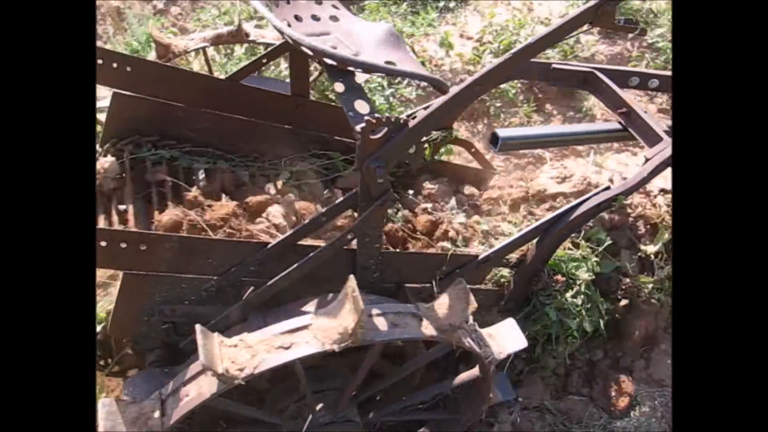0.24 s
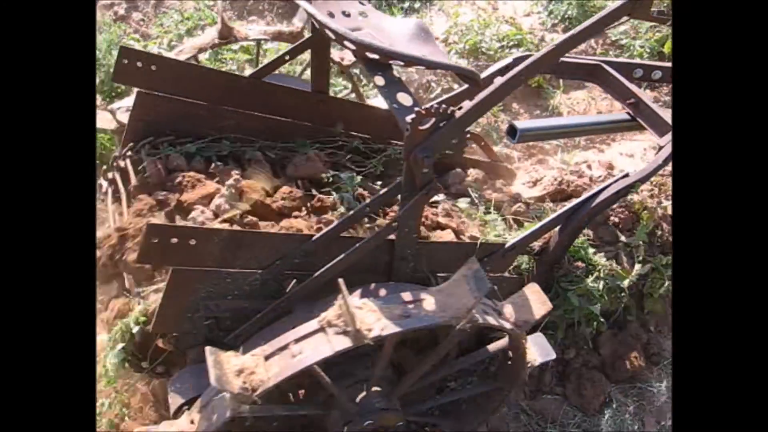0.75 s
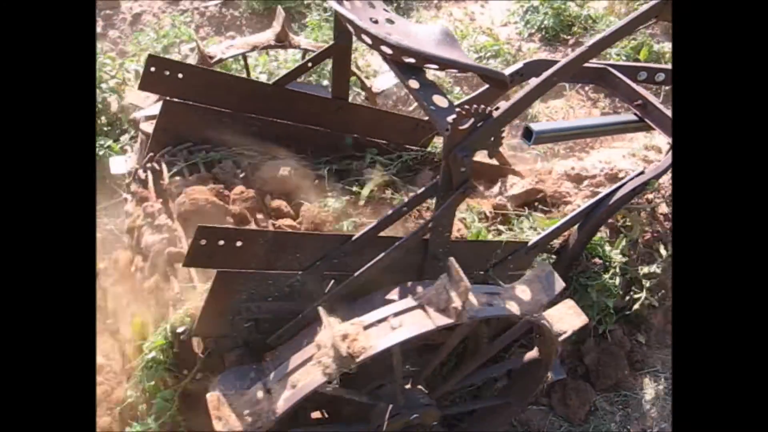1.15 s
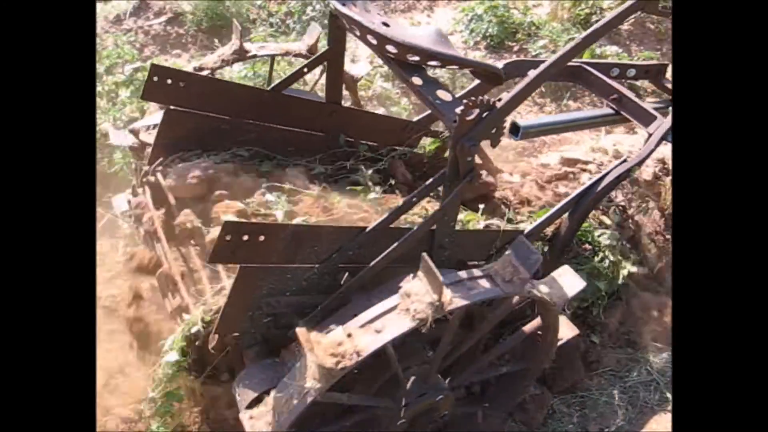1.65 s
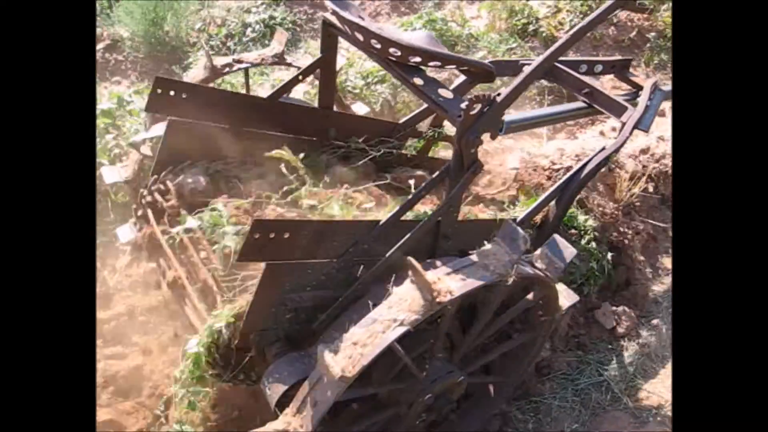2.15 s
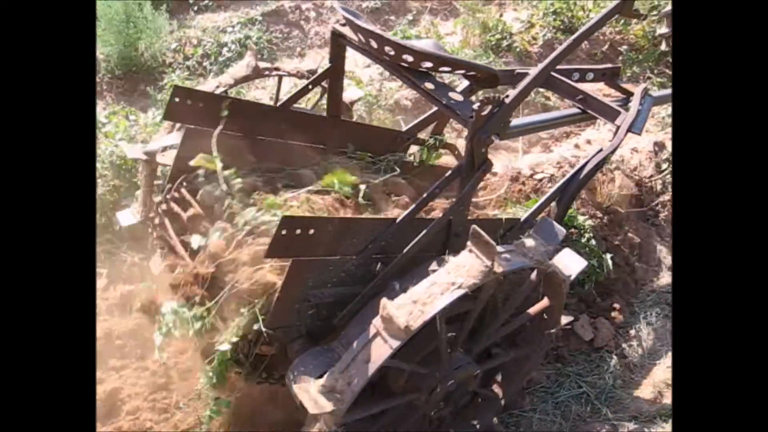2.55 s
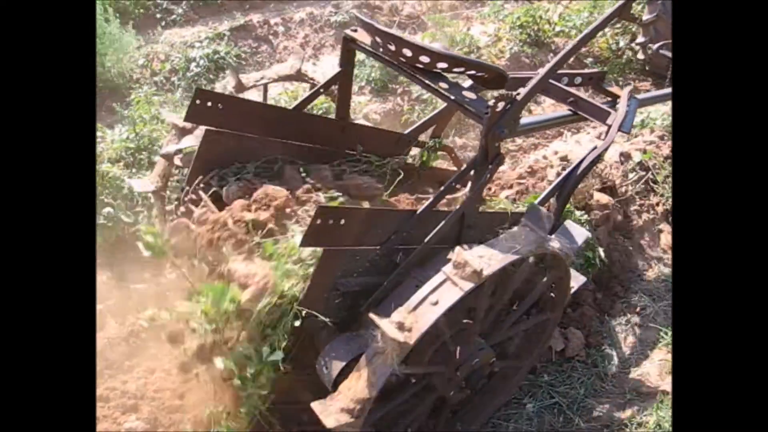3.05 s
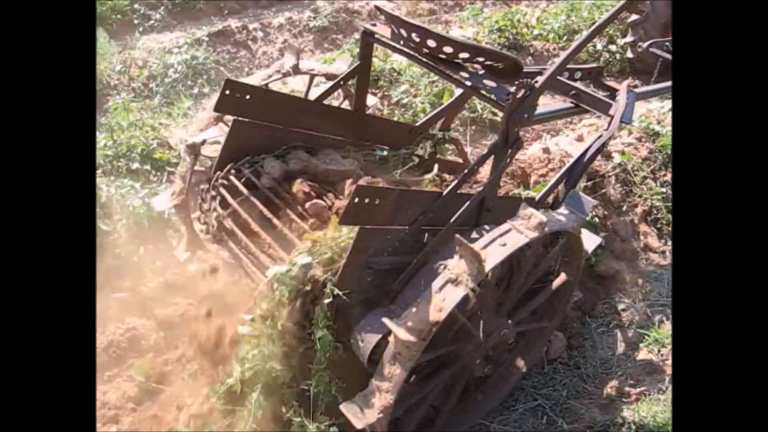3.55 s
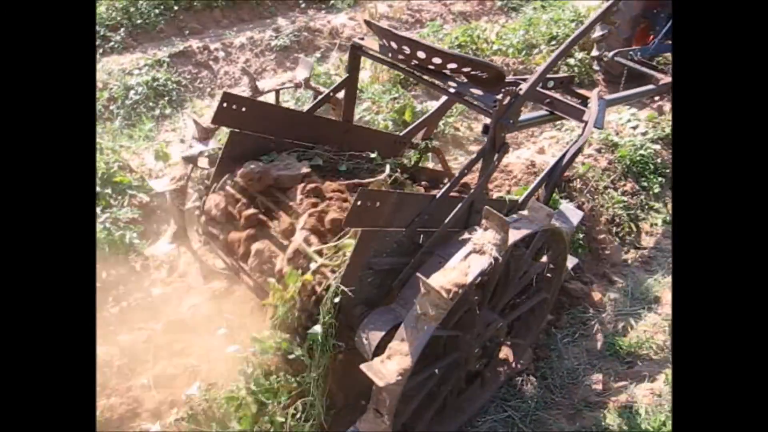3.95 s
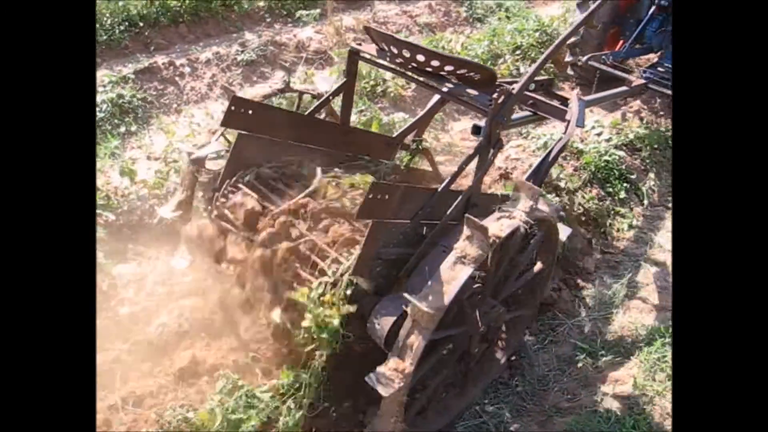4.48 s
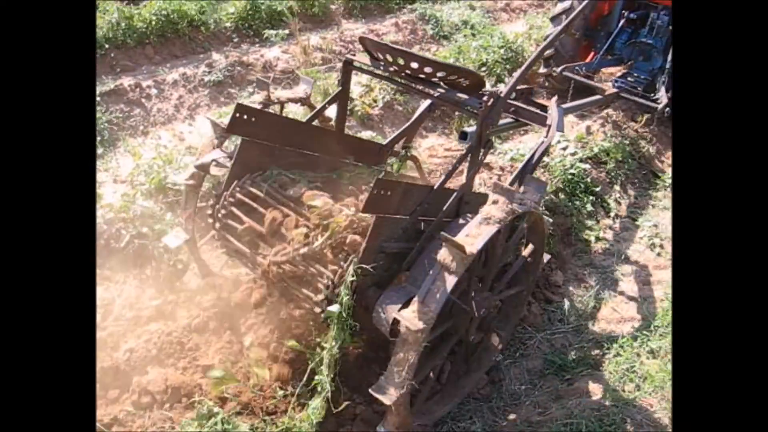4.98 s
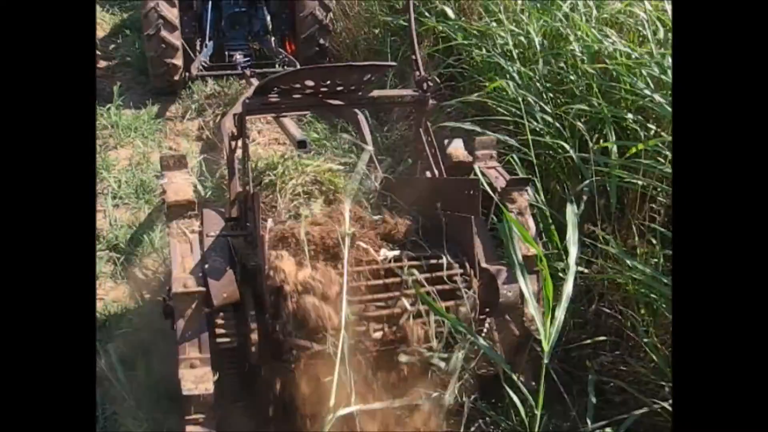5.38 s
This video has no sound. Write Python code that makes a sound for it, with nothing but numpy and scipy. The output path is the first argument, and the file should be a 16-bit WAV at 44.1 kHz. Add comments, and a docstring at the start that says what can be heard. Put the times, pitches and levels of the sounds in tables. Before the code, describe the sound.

Earth thuds through an old digger's rattling steel chain, with short, piercing bearing squeals over a low tractor chug.

```python
"""An old potato digger rolls past, its dry bearing squealing loudly once a turn.
Clods of earth thud through its chain of steel rods, the links clatter, rods slap the frame
and loose parts ring, while the tractor pulling it chugs underneath. A limiter turns everything
down during the loudest peaks. The last moment is heard from behind the machine,
where the engine and the bare chain are plainer."""
import sys
import numpy as np
from scipy import signal
from scipy.fft import rfft, irfft, next_fast_len
from scipy.io import wavfile
from scipy.ndimage import uniform_filter1d, minimum_filter1d, map_coordinates

SR = 44100
rng = np.random.default_rng(int(sys.argv[2]) if len(sys.argv) > 2 else 0)


def master(y):
    """Save y as 16-bit WAV."""
    cut = np.clip(np.atleast_2d(y).T, -1, 1)
    pcm = np.round(cut * 32767)  # scale
    wavfile.write(sys.argv[1], SR, pcm.astype(np.int16))


N = 247842
T = np.arange(N) / SR
BEHIND_S = 5.306  # from here on we listen from behind


def amp(db):
    """Turn decibels into a volume factor."""
    return 10 ** (np.asarray(db) / 20)


def unit(x):
    """Scale a sound to an average strength (rms) of 1."""
    return x / np.sqrt(np.mean(x ** 2) + 1e-20)


def decay(t, fade_s):
    """Die away by 60 dB in fade_s: this is what every 'fade time' below means."""
    return np.exp(-np.log(1000) * t / fade_s)


def noise():
    """A plain, even hiss."""
    return rng.standard_normal(N)


def wobble(rate):
    """A smooth curve through rate random values a second."""
    return map_coordinates(rng.standard_normal(int(N * rate / SR) + 4), [T * rate])


def filtered(x, response):
    """Turn each frequency of x up or down by response(hz)."""
    size = next_fast_len(N + SR // 2)
    return irfft(rfft(x, size) * response(np.fft.rfftfreq(size, 1 / SR)), size)[:N]


def coloured(x, colour):
    """Shape x with a tone colour, a list of (frequency [Hz], level [dB]), at strength 1."""
    freqs, db = np.transpose(colour)
    return unit(filtered(x, lambda hz: amp(np.interp(np.log(hz + 1), np.log(freqs), db))))


def add(track, s, sound):
    """Mix a sound into the track at second s."""
    part = track[max(round(s * SR), 0):][:len(sound)]
    part += sound[:len(part)]


def contacts(rate, spread_db, fade_s):
    """Little hits at random moments, about rate a second, each a burst of hiss."""
    blows = (rng.random(N) < rate / SR) * amp(spread_db * np.clip(noise(), -2, 2))
    power = signal.lfilter([1], [1, -decay(1 / SR, fade_s) ** 2], blows ** 2)
    return unit(np.sqrt(power) * noise())


# Each time the dry bearing catches, a few times a turn:
# (time [s], length [s], pitch [Hz], level [dB], roughness [0-1], fade time [s], lower tone [Hz])
BEARING_GRIPS = [(0.408, 0.019, 3990, -25, 0.05, .08, 3150), (0.424, 0.037, 3917, -5, 0.14, .05, 3100),
                 (0.442, 0.045, 3786, -0.5, 0.1, .06, 3370), (0.494, 0.033, 3915, -19, 0.9, 0.31, 3460),
                 (1.163, 0.016, 4070, -16, 0.3, .04, 3260), (1.172, 0.034, 3948, -3, 0.12, .12, 3180),
                 (1.199, 0.038, 3794, -12, 0.3, .1, 3070), (1.234, 0.029, 3850, -11, .35, .1, 3360),
                 (1.242, 0.09, 3990, -12, 0.49, .42, 3400), (1.854, 0.058, 3770, -4.5, 0.13, .08, 3500),
                 (1.915, 0.055, 3820, -20.5, 0.45, .08, 3420), (2.577, 0.056, 3912, 3.5, 0.06, .1, 3170),
                 (2.629, 0.038, 3938, -1.5, 0.24, .08, 3280), (2.648, 0.061, 3995, -19.5, 0.9, .25, 3460),
                 (2.705, 0.033, 3940, -13, 0.33, .12, 3430), (3.38, 0.033, 3912, -1, 0.16, .08, 3100),
                 (3.408, 0.039, 3980, -14.5, 0.48, .18, 3270), (3.484, 0.024, 3900, -15, .35, .12, 3300)]

def bearing():
    """Dry metal grips and squeals; two weaker tones scrape along, then the main one rings out."""
    free_hz, sag_s = 4040, 0.0058  # a grip drags the wheel's own note down to the grip's pitch
    upper_hz = 4740
    out, t = np.zeros(N), T[:SR // 2]
    # uneven slipping makes each of the three tones tremble
    shake = np.array([wobble(rate) + 1j * wobble(rate) for rate in (200, 200, 260)]) / np.sqrt(2)
    scrape = coloured(noise(), [(2500, -29), (3200, 0.5), (3900, 3.5), (4500, -5), (5400, -20.5)])
    for s, length, hz, db, rough, fade_s, lower_hz in BEARING_GRIPS:
        here = slice(round(s * SR), round(s * SR) + len(t))
        progress = np.minimum(t / length, 1)
        swell = np.abs(np.sin(np.pi * progress)) ** 1.11
        ring = amp(-9) * progress ** 2 * decay(np.maximum(t - length, 0), fade_s)
        cycles = np.cumsum(hz + (free_hz - hz) * np.exp(-t / sag_s)) / SR
        strength = swell * (1 + rough * shake[0, here]) + ring
        squeal = np.imag(strength * np.exp(2j * np.pi * cycles))
        side_tones = np.exp(2j * np.pi * np.outer([lower_hz, upper_hz], t))
        lower, upper = np.imag((1 + 0.93 * shake[1:, here]) * side_tones)
        rub = amp(-9.5) * lower + amp(-16) * upper + amp(-7) * scrape[here]
        add(out, s, np.sqrt(2) * amp(db) * (squeal + rough * swell * rub))
    return out


# How hard the digger works: (time [s], soil level [dB], chain level [dB])
WORKLOAD = [(0, -25, -30), (0.3, -19.5, -28), (0.5, -25.5, -30.5), (0.679, -20.5, -27),
            (0.79, -26.5, -31.5), (0.95, -18.5, -26.5), (1.248, -23, -33), (1.42, -24.5, -25.5),
            (1.549, -32, -29.5), (1.72, -19.5, -27.5), (1.95, -16.5, -32), (2.15, -25.5, -30.5),
            (2.351, -18.5, -28), (2.8, -19, -31.5), (3.25, -20.5, -30), (3.4, -26.5, -30.5),
            (3.75, -18.5, -31), (5.3, -18, -33.5)]
# Batches of soil tumbling over the chain: (time [s], length [s], level [dB])
SOIL_BATCHES = [(0.014, 0.024, -14.5), (0.211, 0.078, -16.5), (0.32, 0.058, -17.5), (0.559, 0.037, -14.5),
                (1.048, 0.059, -12.5), (1.145, 0.067, -11.5), (1.235, 0.046, -5.5), (1.762, 0.095, -13.5),
                (1.945, 0.042, -25), (2.02, 0.066, -17), (2.162, 0.054, -15.5), (2.374, 0.024, -26),
                (2.56, 0.025, -8.5), (2.688, 0.047, -19), (2.748, 0.073, -10.5), (2.856, 0.029, -13.5),
                (2.923, 0.066, -20), (3.016, 0.027, -16), (3.06, 0.029, -16), (3.171, 0.038, -11.5),
                (3.226, 0.077, -11.5), (3.494, 0.12, -14.5), (3.628, 0.13, -12.5), (3.852, 0.042, -16),
                (3.924, 0.098, -14), (4.084, 0.093, -15.5), (4.342, 0.3, -13), (4.656, 0.029, -15),
                (4.697, 0.23, -19), (4.906, 0.058, -15), (4.993, 0.188, -14.5), (5.19, 0.074, -23.5)]
# Tone colour of pouring earth: (frequency [Hz], level [dB])
POUR_COLOUR = [(60, -35), (130, -17), (220, 0), (330, 1), (450, -4.5), (650, -7.5), (900, -12.5),
               (1400, -18), (3000, -44)]

def soil():
    """Clods, crumbs and loose earth cross the chain in a flow, plus batches that come and go."""
    times, flow_db, _ = np.transpose(WORKLOAD)
    power = amp(np.interp(T, times, flow_db)) ** 2
    rise_s, drain_s = 0.008, 0.005
    for s, length, db in SOIL_BATCHES:
        rise = np.clip((T - s) / rise_s + 0.5, 0, 1)
        drain = np.exp(-np.maximum(T - s - length, 0) / drain_s)
        power += (amp(db - 2) * rise * drain) ** 2
    clods = thuds(pitch_hz=198.6, pitch_spread=0.4, fade_cycles=4.6, spread_db=4, count=1100)
    crumbs = thuds(pitch_hz=425, pitch_spread=0.47, fade_cycles=4, spread_db=3, count=1100)
    pour = coloured(contacts(rate=260, spread_db=3, fade_s=0.034), POUR_COLOUR)
    return np.sqrt(power) * (amp(-1) * clods + amp(-8.5) * crumbs + amp(-5) * pour)


def thuds(pitch_hz, pitch_spread, fade_cycles, spread_db, count):
    """Lumps land at random moments, each a short, dull push; deeper ones are louder."""
    samples = np.arange(SR // 25)
    starts = rng.integers(0, N, count)[:, None]
    pitch, size = np.clip(rng.standard_normal((count, 2)), -2, 2).T[:, :, None]
    cycles = pitch_hz * np.exp(pitch_spread * pitch) * samples / SR
    strength = amp(spread_db * size) * np.exp(-pitch_spread * pitch / 2)
    pushes = strength * np.sin(2 * np.pi * cycles) * cycles * decay(cycles, fade_cycles)
    return unit(np.bincount((starts + samples).ravel(), pushes.ravel(), N)[:N])


# Big clods hitting the chain: (time [s], level [dB], pitch [Hz])
BIG_CLODS = [(0.022, -15, 174), (1.048, -3, 200), (1.091, -10, 164), (1.145, -6, 271), (1.708, -9, 210),
             (1.809, -5, 223), (2.16, -11, 196), (3.066, -6, 287), (3.643, -15, 144), (3.777, -5, 208),
             (3.911, -14, 164), (4.08, -1.5, 176), (4.111, -11, 185), (5.119, -5.5, 498), (5.192, -11, 181)]
# Tone colour of the low part of a hit: (frequency [Hz], level [dB])
HIT_COLOUR = [(200, -21), (500, -2), (900, 6.5), (1400, 2.5), (2000, -31.5)]

def heavy_clods():
    """A big clod lands with a dull push and crumbles."""
    push, crumble = np.zeros((2, N))
    t = T[:SR // 12]
    for s, db, hz in BIG_CLODS:
        fade = amp(db) * np.exp(-t / 0.0061) * (1 - np.exp(-t / 0.0022))
        add(push, s, fade * np.sin(2 * np.pi * hz * t))
        add(crumble, s, fade)
    return push + amp(-12.5) * crumble * coloured(noise(), HIT_COLOUR)


# Rods hitting the frame: (time [s], level [dB], brightness [dB], fade time [s])
ROD_SLAPS = [(0.1093, -15.5, -3.5, 0.28), (0.1534, -4.5, 3.5, 0.16), (0.21, -20.5, -3, 0.088),
             (0.332, -16.5, -2.5, .22), (0.5998, -14, 2, 0.16), (0.6697, -19, 3, 0.11),
             (0.9132, -2.5, 5, 0.12), (0.971, -10.5, 4.5, .21), (1.013, -15.5, -8, 0.22),
             (1.2543, -13.5, 12.5, 0.28), (1.645, -6.5, 7, 0.19), (1.6965, -10.5, 9.5, .15),
             (1.7913, -16.5, 1, 0.084), (2.0008, -7.5, 1, 0.11), (2.0437, -17, -2, 0.24),
             (2.4266, -14.5, 5, 0.058), (2.4696, -11, 3, .07), (2.8606, -17.5, -7, 0.16),
             (2.9069, -16.5, -2, 0.065), (3.163, -14.5, -2.5, 0.65), (3.5566, -12.5, -1.5, 0.31),
             (3.919, -18.5, 1, 0.19), (3.9752, -15, -8, .1), (4.0173, -17.5, 5, .09),
             (4.2102, -11.5, -1.5, .08), (4.2499, -15.5, -1, 0.15), (4.6308, -10.5, 5, 0.14),
             (4.7175, -18.5, 0, 0.14), (4.963, -7.5, 7, .12), (5.0739, -16.5, -6, .17),
             (5.3112, -10, -2, .4), (5.3776, -15.5, -5, 0.36)]
# Tone colours of the rattle and of high, gritty hiss: (frequency [Hz], level [dB])
RATTLE_COLOUR = [(900, -13), (1500, -1.5), (2400, 1.5), (3300, -3.5), (4000, -7.5), (4600, -22)]
GRIT_COLOUR = [(2000, -23.5), (3500, -4), (4100, 6), (4500, -2), (4900, 6.5), (5500, -11.5)]

def rod_slaps():
    """A rod slaps the frame: a sharp crack, then a rattling crash that sets the steel ringing."""
    low, mid, high = np.zeros((3, N))
    t = T[:SR // 3]
    for s, db, bright_db, fade_s in ROD_SLAPS:
        crack = 0.3 * np.exp(-t / 0.0012)
        fade = amp(db - 10.5) * (decay(t, fade_s) + crack)
        add(low, s, amp(-3.5 - bright_db) * fade)
        add(mid, s, fade)
        add(high, s, amp(-12.5 + bright_db) * fade)
    rattle = coloured(contacts(rate=4100, spread_db=0, fade_s=0.0033), RATTLE_COLOUR)
    crash = low * coloured(noise(), HIT_COLOUR) + mid * rattle + high * coloured(noise(), GRIT_COLOUR)
    return crash + amp(-9) * steel(mid * noise())


# The notes the steel frame rings on: (pitch [Hz], level [dB], fade time [s])
FRAME_NOTES = [(872, 5, 0.024), (1031, 0.5, 0.098), (1220, -9, 0.068), (1709, 1, 0.11), (2185, 3, 0.13),
               (2360, -1.5, 0.17), (2620, -12, 0.14), (2970, -1, 0.037), (3236, 2, 0.17),
               (3030, -8.5, 0.22), (3850, -4, 0.19), (4480, -11.5, 0.17), (4880, -16, 0.062)]

def steel(blows):
    """Struck steel rings; which notes stand out depends on where each blow lands."""
    out = np.zeros(N)
    for hz, db, fade_s in FRAME_NOTES:
        keep = decay(1 / SR, fade_s)
        spot_db = 4 * np.interp(T, np.linspace(0, T[-1], num=160), rng.standard_normal(160))
        feedback = [1, -2 * keep * np.cos(2 * np.pi * hz / SR), keep ** 2]
        out += amp(db) * unit(signal.lfilter([1], feedback, blows * amp(spot_db)))
    return unit(out) * np.std(blows)


# Tone colour of the clattering links: (frequency [Hz], level [dB])
CLATTER_COLOUR = [(250, -15.5), (600, -1), (900, -1), (1400, -2.5), (1900, -4.5), (2300, -5), (2800, -5.5),
                  (3300, -6.5), (3700, -13.5), (5400, -30.5)]

def chain():
    """Links knock over rollers and ring the frame; grit and small stones sift between the rods."""
    times, _, chain_db = np.transpose(WORKLOAD)
    knocks = contacts(rate=130, spread_db=6, fade_s=0.2)
    frame = steel(contacts(rate=120, spread_db=1, fade_s=0.012))
    clatter = amp(-1) * coloured(knocks, CLATTER_COLOUR) + amp(-8) * frame
    grit = coloured(knocks + 0.9 * contacts(rate=1700, spread_db=1.5, fade_s=0.0033), GRIT_COLOUR)
    stones = coloured(contacts(rate=13, spread_db=2.5, fade_s=0.055), GRIT_COLOUR)
    return amp(np.interp(T, times, chain_db)) * (clatter + amp(-16.5) * grit + amp(-21) * stones)


# Tone colour of the chain from behind: (frequency [Hz], level [dB])
JANGLE_COLOUR = [(100, -33), (280, -1), (500, -10.5), (700, -6), (900, -4.5), (1400, -8), (1900, -8),
                 (2400, -6.5), (3200, -8.5), (3800, -12), (4700, -10), (5500, -20.5)]

def bare_chain():
    """From behind, the rods jangle with no side plate in the way."""
    knocks = contacts(rate=200, spread_db=2, fade_s=0.15)
    return amp(-20.5) * coloured(knocks, JANGLE_COLOUR) + amp(-28.5) * unit(steel(knocks))


# Loose steel parts ringing on one note: (time [s], pitch [Hz], level [dB], fade time [s])
PART_PINGS = [(1.011, 4900, -20.5, .11), (1.4, 1145, -17.5, 0.19), (1.405, 2360, -22, .2),
              (1.439, 1094, -18.5, 0.12), (1.446, 1250, -19, 0.11), (1.446, 2320, -24, 0.16),
              (1.56, 4960, -22, 0.033), (1.645, 3230, -16, 0.08), (1.698, 3230, -22.5, 0.14),
              (2.305, 937, -20.5, 0.36), (3.266, 1780, -20, 0.14), (3.505, 1815, -17, 0.079),
              (3.552, 2400, -18.5, .11), (3.59, 4850, -29, 0.13), (3.974, 1751, -22.5, 0.16),
              (4.21, 3250, -21.5, .085), (4.301, 4850, -20.5, .05), (4.722, 2800, -22, 0.1),
              (5.156, 1020, -20, .15), (5.376, 870, -14, .17), (5.452, 2540, -16.5, 0.16),
              (5.598, 798, -15, .13)]

def loose_parts():
    """A loose part is struck with a gritty tick, chatters and rings on."""
    ring, ticks = np.zeros((2, N))
    t = T[:SR // 4]
    chatter = wobble(220)
    rise = 1 - np.exp(-t / 0.00077)
    for s, hz, db, fade_s in PART_PINGS:
        phase = 2 * np.pi * hz * t + 0.5 * np.roll(chatter, -round(s * SR))[:len(t)]
        add(ring, s, amp(db) * np.sin(phase) * rise * decay(t, fade_s))
        add(ticks, s, amp(db - 8.5) * np.exp(-t / 0.0044))
    return ring + ticks * coloured(noise(), [(500, -18.5), (1200, 6), (3000, 2), (5400, -8)])


# Brief swells in the low rumble: (time [s], rise in level [dB])
RUMBLE_SWELLS = [(.4, 4.5), (0.649, 4), (.78, 3.5), (1.39, 8), (1.6, 5), (1.761, 7), (1.999, 5.5),
                 (2.19, 4), (3.14, 2.5), (3.28, 4), (3.679, 7), (4, 6.5)]
# Tone colour of the rumbling ground: (frequency [Hz], level [dB])
RUMBLE_COLOUR = [(12, -17.5), (25, -4.5), (40, 3), (60, 0), (90, -2), (130, -7.5), (220, -14), (500, -66.5)]

def ground_rumble():
    """The digging blade rumbles through the ground; now and then the rumble swells briefly."""
    swell_s = 0.031
    swells_db = sum(db / (1 + ((T - s) / swell_s) ** 2) for s, db in RUMBLE_SWELLS)
    return amp(-18.5 + swells_db + 0.36 * wobble(6.5)) * coloured(noise(), RUMBLE_COLOUR)


# The tones in the exhaust note: (multiple of the firing rate, level [dB])
EXHAUST_TONES = [(1, 1), (2, 2), (3, -4.5), (4, -19), (5, -11.5), (6, -21), (7, -21.5)]

def engine():
    """The tractor's exhaust beats a little unevenly, with a puff of noise as the fuel burns."""
    firing_hz = 39.89 * (1 + 0.01216 * wobble(5.5))
    phase = 2 * np.pi * np.cumsum(firing_hz) / SR
    note = unit(sum(amp(db + 0.83 * wobble(22)) * np.cos(k * phase) for k, db in EXHAUST_TONES))
    puffs = coloured(noise() * (1 + np.cos(phase)) ** 2, CLATTER_COLOUR)
    return amp(np.where(T < BEHIND_S, -25, -18.5)) * (note + amp(-14.5) * puffs)


def scene():
    """The digger from the side, then from behind."""
    beside = ground_rumble() + soil() + chain() + heavy_clods() + bearing()
    behind = bare_chain() + amp(-22.5) * coloured(noise(), RUMBLE_COLOUR)
    return (np.where(T < BEHIND_S, beside, behind) + engine() + rod_slaps() + loose_parts())[None]


def record(dry):
    """A fast limiter turns the loudest peaks down, then the highest treble is cut away."""
    ceiling, top_hz = 0.85, 5420
    needed = np.minimum(1, ceiling / (np.abs(dry[0]) + 1e-9))
    gain = uniform_filter1d(minimum_filter1d(needed, size=600), size=400)
    return filtered(dry[0] * gain, lambda hz: 1 / np.sqrt(1 + (hz / top_hz) ** 120))[None]


dry = scene()
out = record(dry)
master(out)
```